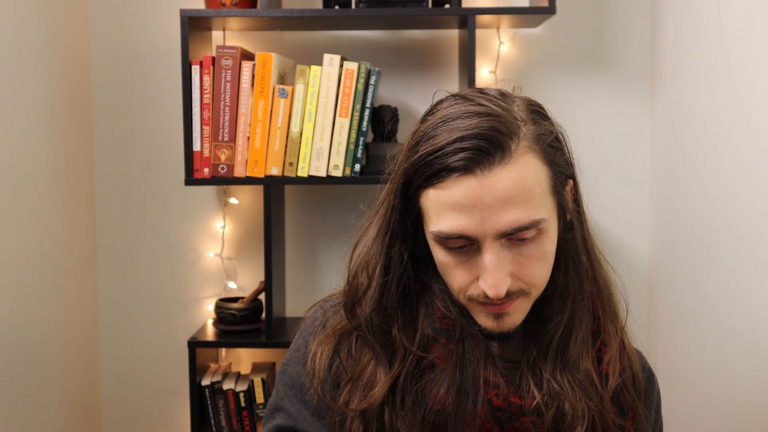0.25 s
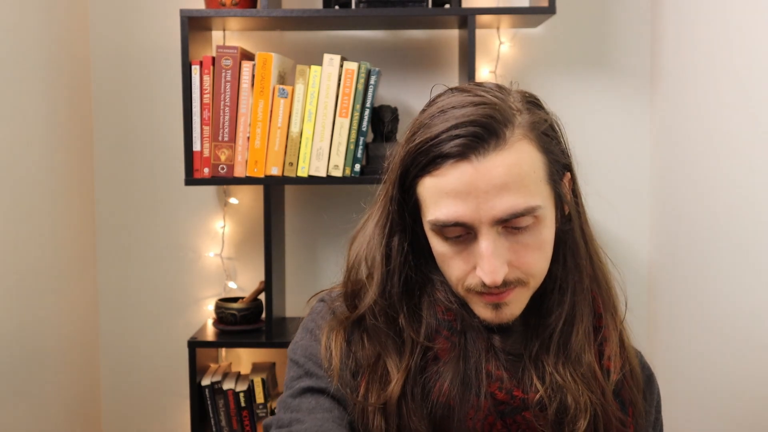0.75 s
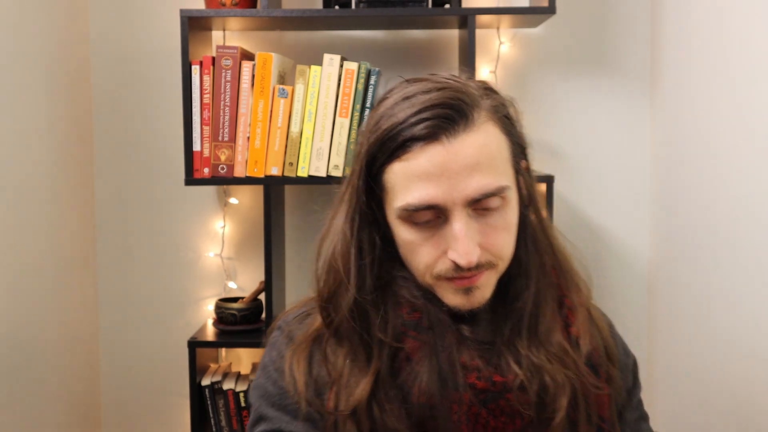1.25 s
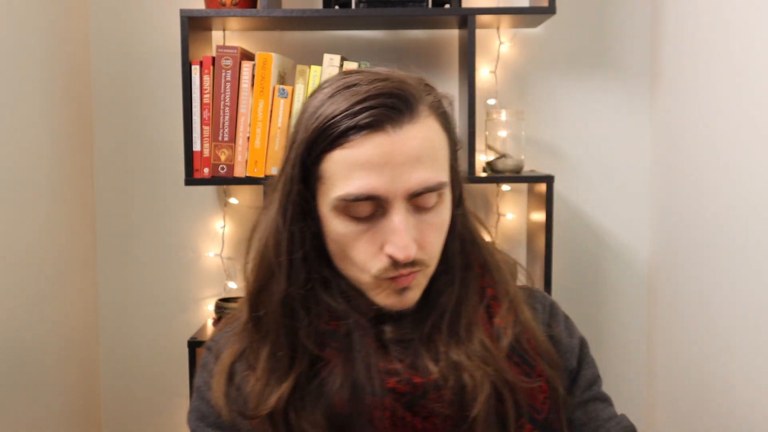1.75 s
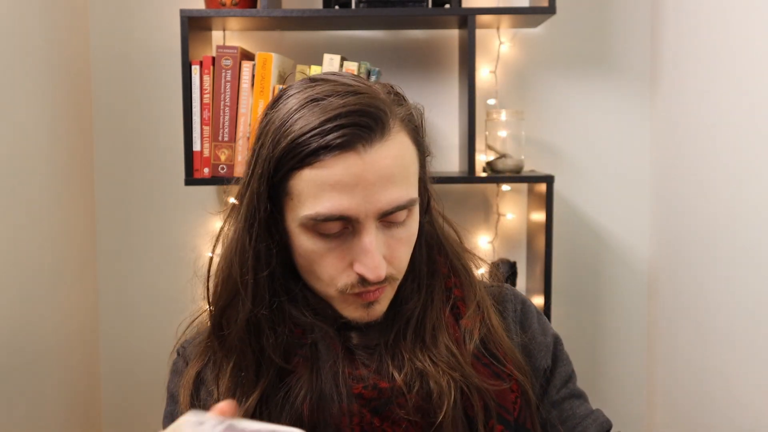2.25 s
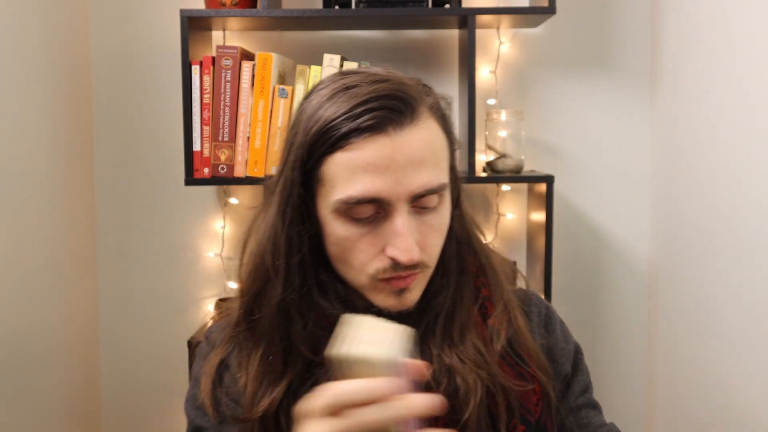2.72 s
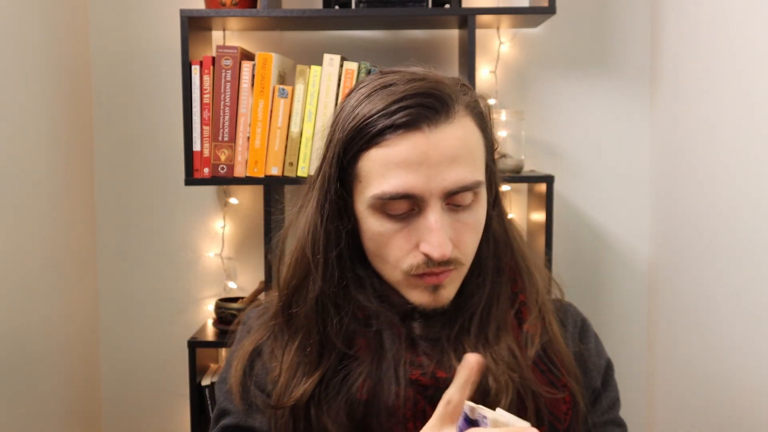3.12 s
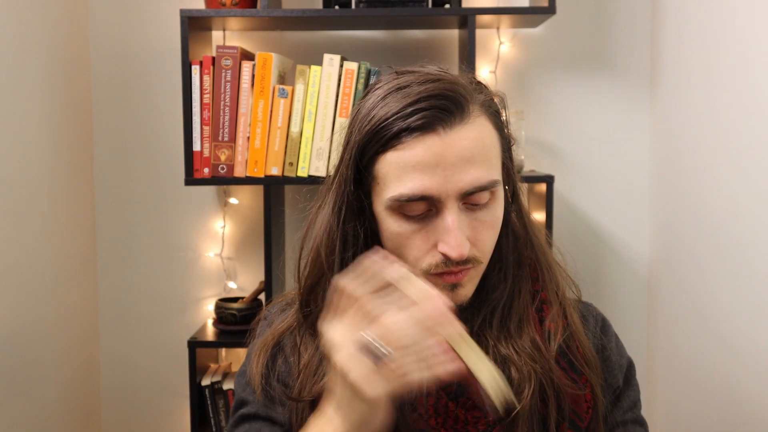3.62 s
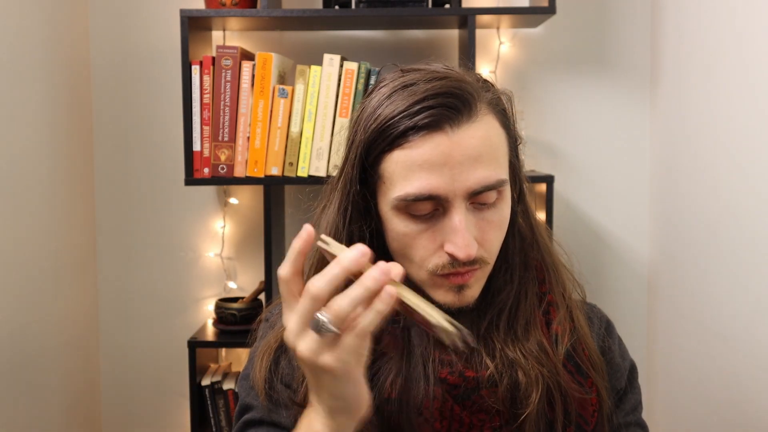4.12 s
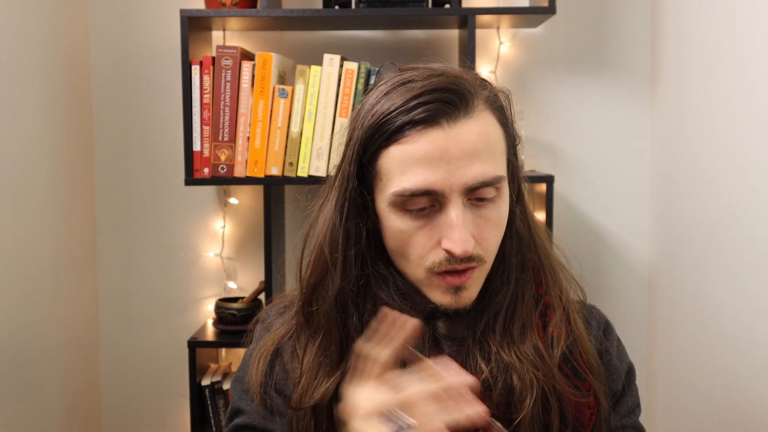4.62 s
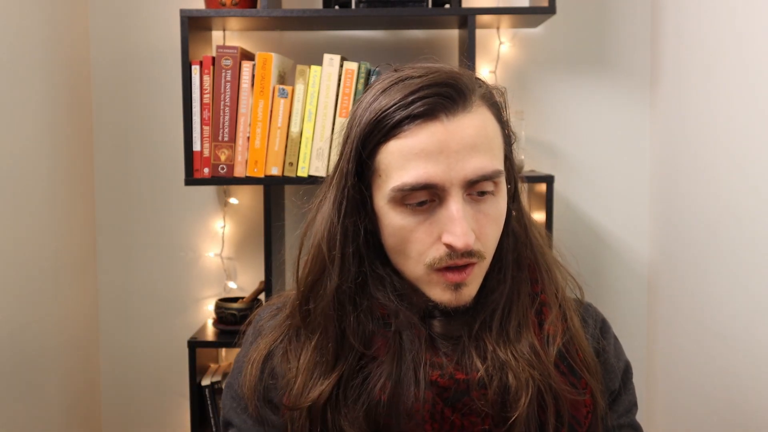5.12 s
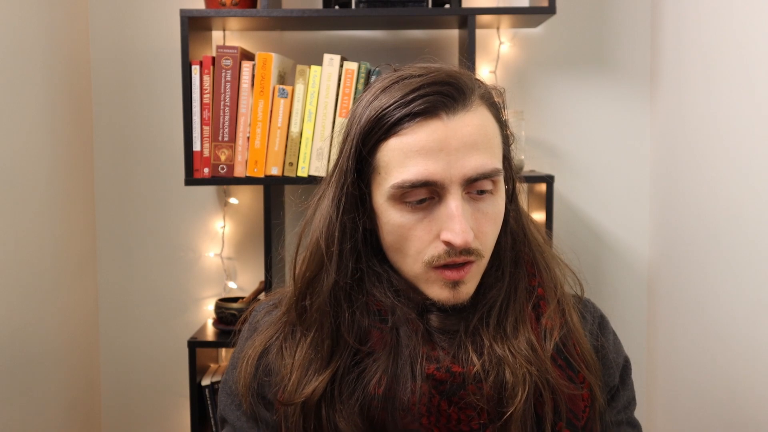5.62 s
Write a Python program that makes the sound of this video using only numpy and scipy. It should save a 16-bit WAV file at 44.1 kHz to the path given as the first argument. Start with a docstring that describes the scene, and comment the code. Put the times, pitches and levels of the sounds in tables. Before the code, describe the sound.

In a small quiet room, something hard is set down, then a pack of playing cards is knocked, slid, slapped and flicked close by.

```python
"""A faint hum and hiss are heard first, then a dull bump of a table in a small quiet room, close by.
Something hard is set down; a deck of cards is knocked square in soft taps; then packets slap, slide and flick.
Bumps, knocks and the hard blow are impulses that ring decaying modes; card contacts are short noisy rattles.
Sliding is a dense train of random slips under swelling envelopes. The hum and a far motor's drone are sines,
and the moving air is filtered noise."""
import sys
import numpy as np
from scipy import signal
from scipy.fft import rfft, irfft
from scipy.io import wavfile

SR = 44100
rng = np.random.default_rng(int(sys.argv[2]) if len(sys.argv) > 2 else 0)


def to_wav(sig):
    """Store sig (one row per channel, or 1-D mono) as 16-bit WAV at the path in sys.argv[1].

    Samples outside -1..1 are clipped; the rate is SR.
    """
    pcm = np.clip(np.atleast_2d(sig), -1, 1) * 32767
    pcm = np.round(pcm).astype(np.int16)
    wavfile.write(sys.argv[1], SR, pcm.T)  # frames by channels


N = 258543
TIME = np.arange(N) / SR   # seconds


def from_db(db):
    """Amplitude gain is ten to the power of the level in decibels over twenty."""
    return 10 ** (np.asarray(db) / 20)


def rms_one(x):
    """Dividing by the root of the mean power brings a sound to an rms of one."""
    return x / np.sqrt(np.mean(x ** 2) + 1e-20)


def at_hz(points, hz):
    """Pitch is logarithmic, so a table is interpolated along log frequency."""
    table_hz, value = np.transpose(points)
    return np.interp(np.log(np.maximum(hz, 1)), np.log(table_hz), value)


def drift(rate):
    """Slow random modulation: normal values, `rate` of them per second, joined by straight lines."""
    return np.interp(TIME * rate, np.arange(N // 10), rng.standard_normal(N // 10))


def through(x, response):
    """A linear system's output is its input convolved with its impulse response."""
    return signal.fftconvolve(x, response)[:N]


def colour(x, spectrum, size=8192):
    """Minimum-phase filtering: folding the cepstrum makes a causal, unit-energy response of given spectrum."""
    level_db = at_hz(spectrum, np.linspace(0, SR / 2, size // 2 + 1))
    cepstrum = irfft(np.log(from_db(level_db)))
    cepstrum[1:size // 2] *= 2
    cepstrum[size // 2 + 1:] = 0
    response = irfft(np.exp(rfft(cepstrum)))
    return through(x, response / np.linalg.norm(response))


def clicks(times, db):
    """Impulsive excitation: each contact is a single sample."""
    out = np.zeros(N)
    out[np.round(np.asarray(times) * SR).astype(int)] = from_db(db)
    return out


def ring(x, hz, t60):
    """Damped resonance: a unit click starts a sine of height one that falls 60 dB in t60 seconds."""
    radius, angle = from_db(-60 / (t60 * SR)), 2 * np.pi * hz / SR
    return signal.lfilter([0, np.sin(angle)], [1, -2 * radius * np.cos(angle), radius ** 2], x + 1e-18)


def contact(s, db, settle_s, rattle, size=6000):
    """Repeated collision: a first touch, then tiny impacts that fall 60 dB in settle_s as the parts settle."""
    after = rng.standard_normal(size) * np.exp(-np.log(1000) * np.arange(size) / SR / settle_s)
    after *= rattle / np.linalg.norm(after)
    after[0] = 1   # the first touch
    out, start = np.zeros(N + size), round(s * SR)
    out[start:start + size] = from_db(db) * after
    return out[:N]


def room(x, wet_db, gap_s=0.001067, size=16000):
    """Reverberation: dense reflections from table and near walls decay at a rate set by frequency."""
    # Reverberation time. Each row: frequency in Hz, time to fall 60 dB in seconds.
    decay_times = [(100, 0.66), (400, 0.18), (1500, 0.19), (4000, 0.12), (12000, 0.13)]
    t, tail = np.arange(size) / SR, 0
    edges = np.geomspace(60, 19000, 11)   # Hz
    for low, high in zip(edges, edges[1:]):
        band_pass = signal.butter(2, [low, high], "band", fs=SR, output="sos")
        band = signal.sosfilt(band_pass, rng.standard_normal(size))
        t60 = at_hz(decay_times, np.sqrt(low * high))
        band = band * np.exp(-np.log(1000) * t / t60) * (t > gap_s)
        # energy in proportion to bandwidth
        tail = tail + band / np.linalg.norm(band) * np.sqrt(2 * (high - low) / SR)
    return x + from_db(wet_db) * through(x, tail)


def background(waver_db=0.65, hiss_db=-58.5, rumble_db=-62.5):
    """Tones and broadband noise: a motor's gently wavering hum, with the rumble and hiss of moving air."""
    # Hum tones. Each row: frequency in Hz, rms level in dB about which it wavers.
    hum_tones = [(75.2, -75.5), (225.6, -57), (300.7, -56)]
    # Spectrum of the steady hiss. Each row: frequency in Hz, relative level in dB.
    hiss_colour = [(220, -53), (380, -5.5), (511, -9), (579, -4.5), (698, -8.5), (791, -2), (868, -4),
                   (1010, 0), (1470, -10), (1620, -4), (2710, -5.5), (3420, -9.5), (5130, -5),
                   (7940, -21.5), (15800, -28.5)]
    # Spectrum of the rumble. Each row: frequency in Hz, relative level in dB.
    rumble_colour = [(15, -16), (40, -13.5), (72, -1.5), (100, -8.5), (130, -16.5), (200, -8), (330, -15.5),
                     (450, -23.5), (1000, -76.5)]
    hum = 0
    for hz, db in hum_tones:
        gain = np.sqrt(2) * from_db(db + waver_db * drift(5.3))
        phase = 2 * np.pi * (hz * TIME + rng.random()) + 0.27 * drift(0.83)
        hum = hum + gain * np.sin(phase)
    hiss = from_db(hiss_db) * colour(rng.standard_normal(N), hiss_colour)
    rumble = from_db(rumble_db) * colour(rng.standard_normal(N), rumble_colour)
    return hum + hiss + rumble


def drone():
    """Transmission loss: one low tone is all that passes the walls; its phase integrates the motor's speed."""
    # A far motor speeding up and easing off. Each row: time in seconds, frequency in Hz, rms level in dB.
    motor = [(3.1, 112, -85), (3.45, 116, -66), (3.8, 120, -63), (4.3, 126, -60), (4.8, 127, -70.5),
             (5.301, 124, -64), (5.86, 116, -71)]
    s, hz, db = np.transpose(motor)
    turns = np.cumsum(np.interp(TIME, s, hz)) / SR
    return np.sqrt(2) * from_db(np.interp(TIME, s, db)) * np.sin(2 * np.pi * turns)


def bumps(softness_hz=220, rock_s=0.048, rock_boom_db=-2.5, rock_thud_db=-19.5):
    """Modal excitation: the table sways at its lowest modes and rocks back once; firm bumps wake its top."""
    # Dull bumps. Each row: start in seconds, strength of the boom in dB, strength of the thud in dB.
    bump_rows = [(.615, -35.5, -32), (0.724, -46.5, -34), (0.823, -45, -50), (0.945, -44.5, -41.5),
                 (1.516, -37.5, -60), (2.005, -63, -43), (4.774, -68, -45.5), (5.013, -58, -42)]
    s, boom_db, thud_db = np.transpose(bump_rows)
    soft = signal.butter(2, softness_hz, fs=SR, output="sos")   # an arm gives way as it lands
    boom = signal.sosfilt(soft, clicks(s, boom_db) + clicks(s + rock_s, boom_db + rock_boom_db))
    thud = signal.sosfilt(soft, clicks(s, thud_db) + clicks(s + rock_s, thud_db + rock_thud_db))

    sway = ring(boom, hz=48, t60=0.42)
    sway += from_db(-2) * ring(boom, hz=28, t60=0.28)
    sway -= from_db(-6) * ring(boom, hz=60.6, t60=0.12)

    top = ring(thud, hz=115.5, t60=0.15)
    top -= from_db(1) * ring(thud, hz=151, t60=0.071)
    top += from_db(4.5) * ring(thud, hz=279, t60=0.075)
    return room(from_db(-1.5) * sway + from_db(-3.0) * top, wet_db=-4.5)


def clack(contact_hz=4500):
    """Hard impact: a brief blow, low-passed by its contact time, cracks, chatters and leaves modes ringing."""
    # A hard thing nudged, then set down. Each row: start in seconds, strength of the blow in dB.
    blows = [(0.8353, -27.5), (2.1446, -10.5)]
    # Its ring. Each row: frequency in Hz, relative level in dB, time to fall 60 dB in seconds.
    modes = [(137, -20.5, 0.11), (214, -23.5, 0.22), (291.5, -12, 0.066), (526, -16.5, 0.057),
             (566, -18, 0.059), (749, -16.5, 0.11), (904, -26.5, 0.2), (1130, -16.5, 0.099),
             (1276, -28.5, 0.3), (1474, -12.5, 0.05), (1624, -33, 0.09), (1783, -17.5, 0.12),
             (2010, -27, 0.17), (2270, -19, 0.073), (2365, -15, 0.031), (2546, -22.5, 0.092),
             (1870, -32, 0.0062), (3330, -0.5, 0.0084)]
    # Spectrum of the crack. Each row: frequency in Hz, relative level in dB.
    crack_colour = [(100, -17), (250, -3), (520, 0), (800, -0.5), (1300, 2.5), (2400, -5), (3500, -5),
                    (4050, -9), (4600, -21), (7500, -36), (10000, -61), (16000, -48)]
    soft = signal.butter(2, contact_hz, fs=SR, output="sos")
    blow = signal.sosfilt(soft, clicks(*np.transpose(blows)))
    body = 0
    for k, (hz, db, t60) in enumerate(modes):
        body = body + (-1) ** k * ring(blow * from_db(db), hz, t60)   # successive modes alternate in sign
    chatter = sum(contact(s, db, settle_s=0.022, rattle=1.0) for s, db in blows)
    crack = colour(chatter, crack_colour)
    return from_db(-2.5) * body + room(from_db(5.0) * crack, wet_db=0.0)


def swell(s, rise_s, fall_s, roundness=1):
    """Exponential envelope: it grows to one at time s and dies away; roundness 1 is a peak, 2 a bell."""
    away = np.where(TIME < s, (s - TIME) / rise_s, (TIME - s) / fall_s)
    return np.exp(-np.minimum(away ** roundness, 20))


def friction(release_share=0.97, roundness=1.8, grip_sheen_db=-11):
    """Incoherent addition: strokes and the faint shifting of the held deck sum as powers, in rub and sheen."""
    # Strokes of card over card. Each row: time of full speed in seconds, relative friction level in dB,
    # swell time in seconds, sheen (top hiss of a light, quick stroke) against the friction in dB.
    strokes = [(.665, -60.5, 0.044, -18), (.9, -62, 0.17, -14), (2.8, -65.5, .15, -6.5),
               (3.2, -65.5, 0.22, -6), (3.6, -62, .1, -5), (3.981, -54, 0.019, 1),
               (4.037, -44.5, 0.039, -4.5), (4.381, -52.5, 0.048, -5.5), (4.706, -55.5, 0.052, -3.5),
               (4.981, -48, 0.0069, -2.5), (5.08, -57.5, 0.096, -17), (5.36, -67, 0.07, -14),
               (5.565, -61.5, .06, -19), (5.771, -47, 0.0072, -13)]
    # The deck shifting in the hand. Each row: time in seconds, relative friction level in dB.
    grip_levels = [(3, -80), (3.9, -69), (4.3, -67), (5.4, -70), (5.86, -73)]
    rubs = []
    for s, db, swell_s, sheen_db in strokes:
        stroke = from_db(db) * swell(s, swell_s, release_share * swell_s, roundness)
        rubs.append((stroke, sheen_db))
    grip = from_db(np.interp(TIME, *np.transpose(grip_levels))) * (TIME > grip_levels[0][0])
    rubs.append((grip, grip_sheen_db))
    rub_gain = np.sqrt(sum(rub ** 2 for rub, _ in rubs))
    sheen_gain = np.sqrt(sum((rub * from_db(sheen_db)) ** 2 for rub, sheen_db in rubs))
    return rub_gain, sheen_gain


def sliding(rub_gain, sheen_gain, grains_per_s=5000, size_db=2.5, unsteady_db=4):
    """Stick-slip friction: card faces catch and let go in dense tiny slips of random size and sign."""
    # Spectrum of the rubbing. Each row: frequency in Hz, relative level in dB.
    rub_colour = [(200, -4.5), (700, 2), (1600, -13), (2600, -5.5), (3700, -1.5), (5500, 0.5), (7000, -7.5),
                  (8800, -11.5), (12000, -18.5), (16000, -31)]
    sheen_colour = [(4000, -36.5), (8000, 1), (12000, -5.5), (15000, -11), (17000, -5)]   # (Hz, dB)
    slips = (rng.random(N) < grains_per_s / SR) * rng.choice([-1, 1], N)
    slips = slips * from_db(size_db * np.minimum(rng.exponential(1, N), 5))
    slips = rms_one(slips) * from_db(unsteady_db * drift(90))
    rub = colour(slips * rub_gain, rub_colour)
    sheen = colour(slips * sheen_gain, sheen_colour)
    return room(from_db(0.5) * (rub + sheen), wet_db=-1.5)


def flicks(rub_gain, catches_per_s=40, catch_db=1):
    """Sudden release: single edges snap off the pack; smaller ones catch by chance while cards slide."""
    # Card edges flicking free. Each row: start in seconds, strength of the first touch in dB.
    flick_rows = [(3.950, -25), (4.020, -33), (4.059, -28), (4.318, -36.5), (4.351, -30.5), (4.376, -25.5),
                  (4.656, -33), (4.702, -33), (4.9722, -34), (5.353, -38.5), (5.657, -38.5), (5.762, -25)]
    # Spectrum of a flicked edge. Each row: frequency in Hz, relative level in dB.
    flick_colour = [(200, -11), (700, -3.5), (1150, 3), (1700, -10), (2600, -4.5), (3700, 0.5), (5500, -4),
                    (7000, -6), (8800, -12), (12000, -17.5), (16000, -31)]
    snaps = sum(contact(s, db, settle_s=0.012, rattle=2.16) for s, db in flick_rows)
    catches = (rng.random(N) < catches_per_s / SR) * rub_gain * from_db(catch_db)
    return room(from_db(-1.5) * colour(snaps + catches, flick_colour), wet_db=-1.5)


def slaps(brush_db=2.5):
    """Successive impact: a brushing grows up to the moment of landing, then many small contacts settle."""
    # At 0.83 s, part of a rounded knock of something set down; the later rows are packets landing.
    # Each row: start in seconds, strength of the first touch in dB,
    # growth time of the brushing in seconds, time for the settling to fall 60 dB in seconds.
    slap_rows = [(.830, -30, .002, .006), (3.9501, -25, 0.000074, 0.012), (5.012, -34.5, 0.00071, 0.012),
                 (5.032, -38.5, 0.0064, 0.06), (5.080, -25.5, 0.0076, 0.034)]
    # Spectrum of a slap. Each row: frequency in Hz, relative level in dB.
    slap_colour = [(80, -2), (160, -1), (280, -14), (400, -10), (590, 5), (850, -4), (1130, 3),
                   (1600, -8.5), (2000, -3.5), (2500, -2), (3300, -1.5), (4400, -6), (5600, -5),
                   (8500, -25), (16000, -39)]
    landing = 0
    for s, db, brush_s, settle_s in slap_rows:
        brush = rng.standard_normal(N) * swell(s, brush_s, brush_s) * (TIME < s)
        brush = from_db(db + brush_db) * brush / np.linalg.norm(brush)
        landing = landing + brush + contact(s, db, settle_s, rattle=1.74)
    return room(from_db(7.5) * colour(landing, slap_colour), wet_db=2.0)


def knocks(even_edge_db=-7.5, fidgets_per_s=15, fidget_db=-52.5, size=60):
    """Impact and rebound: one of two contacts may click more crisply; gives (s, knock dB, edge click dB)."""
    # At 0.8236 s, part of the rounded knock of something set down, its two contacts heard as one.
    # The later rows are double knocks: the deck touches the table and rebounds.
    # Each row: start in seconds, first contact in dB, gap in seconds, second contact against the first in dB,
    # crispness in dB (+ the second contact clicks more, - the first).
    tap_rows = [(0.8236, -34, 0.0033, 2.5, -0.5), (2.598, -34, 0.012, 4.5, 4), (2.707, -36, .0144, 2, 4),
                (2.804, -37, 0.018, -0.5, 8.5), (2.8991, -37.5, 0.024, -6.5, -4.5),
                (2.982, -38.5, .025, -2.5, 8), (3.081, -37.5, 0.029, -8.5, 0), (3.154, -42.5, 0.031, 1, 7),
                (3.2462, -37.5, 0.026, -6.5, 0), (3.313, -48, 0.034, 8, 3.5), (3.402, -40, 0.046, -7, 0),
                (3.512, -43, .044, 2, -5), (3.689, -42.5, .039, 2, -6.5), (3.872, -45, .035, 2, -5),
                (4.148, -45, 0.027, -.5, -1), (4.262, -48.5, 0.029, 4, -2), (4.3488, -52.5, 0.025, 9, -11),
                (4.455, -50.5, .044, 4, -15), (4.775, -47, 0.029, -16, -11), (4.972, -47.5, 0.036, 3.5, -8)]
    # Further single knocks of the deck, two of them closing a run of three.
    # Each row: start in seconds, knock in dB, edge click in dB.
    single_knocks = [(2.394, -51, -50), (2.6214, -38.5, -30), (2.736, -32.5, -34.5), (5.077, -38.5, -29.5)]
    blows = list(single_knocks)
    for s, db, gap_s, second_db, crisp_db in tap_rows:
        blows.append((s, db, db + even_edge_db - crisp_db))
        blows.append((s + gap_s, db + second_db, db + second_db + even_edge_db + crisp_db))
    # fingers touch the deck lightly at random times while the cards are handled
    fidget_start_s, fidget_end_s = 3.95, 5.6
    touches = fidget_start_s + np.cumsum(rng.exponential(1 / fidgets_per_s, size))
    blows += [(s, fidget_db, fidget_db + even_edge_db) for s in touches if s < fidget_end_s]
    return blows


def taps(spread_db=2.5, dulling=0.18, middling_db=-38, hand_damping=0.84):
    """Modal ringing: each knock excites the modes in its own balance, and edges add a dry click."""
    # What a knock rings. Each row: frequency in Hz, relative level in dB,
    # time to fall 60 dB in seconds before the hand damps it.
    modes = [(125, -22.5, 0.11), (188, -13.5, 0.078), (247.4, -5, 0.1), (287.4, -1, 0.097),
             (345, -9, 0.053), (395, -11, 0.14), (509.6, -7.5, 0.11), (570, -16, 0.13), (684, -4, 0.055),
             (754, -8, 0.04), (891, -17.5, 0.067), (1024, -13, 0.057), (1166, -21, 0.17), (1497, -23, .05)]
    # Spectrum of the edge click. Each row: frequency in Hz, relative level in dB.
    edge_colour = [(200, -5), (1200, 6), (1700, 0.5), (2300, -1.5), (3100, -8), (3900, -4.5), (4800, -17.5),
                   (6500, -18.5), (9000, -47), (16000, -36)]
    s, knock_db, edge_db = np.transpose(knocks())
    # dB per octave: a heavy blow stays in contact longer, a light one sounds thin
    slope_db = -dulling * (knock_db - middling_db)
    body = 0
    for k, (hz, db, t60) in enumerate(modes):
        chance_db = spread_db * rng.standard_normal(len(s))
        blow = clicks(s, knock_db + db + slope_db * np.log2(hz / 450) + chance_db)
        body = body + (-1) ** k * ring(blow, hz, t60 * hand_damping)
    edges = sum(contact(at, db, settle_s=0.015, rattle=0.78) for at, db in zip(s, edge_db))
    click = colour(edges, edge_colour)
    return room(from_db(2) * body, wet_db=-5) + room(from_db(15.5) * click, wet_db=-2)


def scene():
    """Superposition: all sources add, and reach both channels alike."""
    rub_gain, sheen_gain = friction()
    surroundings = background() + drone()
    table = bumps() + clack()
    handling = sliding(rub_gain, sheen_gain) + flicks(rub_gain) + slaps() + taps()
    mono = surroundings + table + handling
    return np.array([mono, mono])


def record(dry, hiss_db=-77.0, cutoff_hz=15850):
    """Antiphase noise and band limiting: a faint hiss of opposite sign in each channel, and a cut top."""
    hiss_colour = [(2000, -17), (4500, -43), (6000, -12.5), (8000, -1.5),
                   (12000, -4.0), (16000, -1.5), (20000, -24)]   # (Hz, dB)
    hiss = from_db(hiss_db) * colour(rng.standard_normal(N), hiss_colour)
    noisy = dry + np.array([hiss, -hiss])
    low_pass = signal.ellip(12, .1, 80, cutoff_hz, fs=SR, output="sos")
    return signal.sosfilt(low_pass, noisy)


dry = scene()
out = record(dry)
to_wav(out)
```